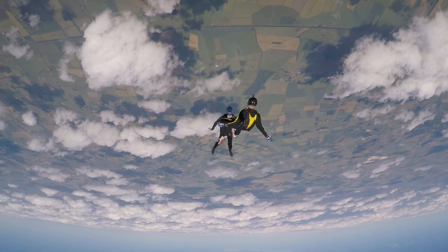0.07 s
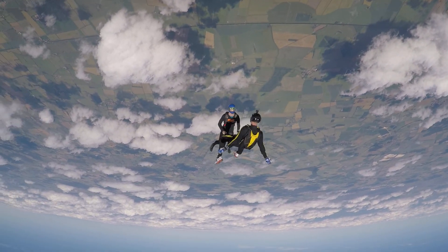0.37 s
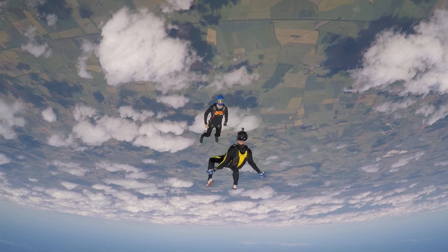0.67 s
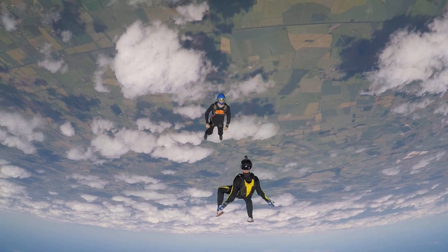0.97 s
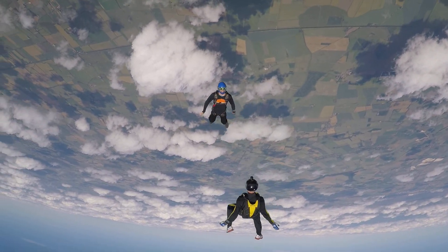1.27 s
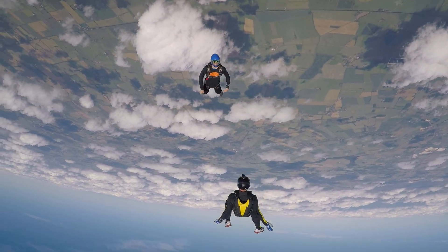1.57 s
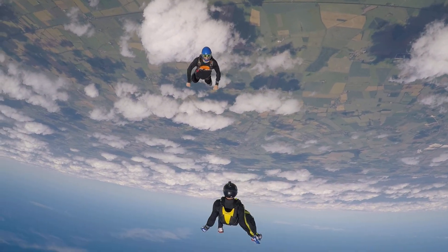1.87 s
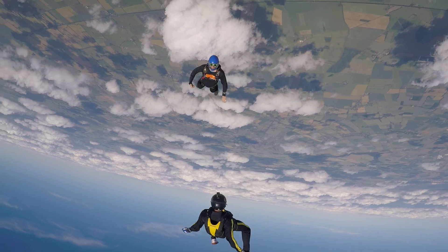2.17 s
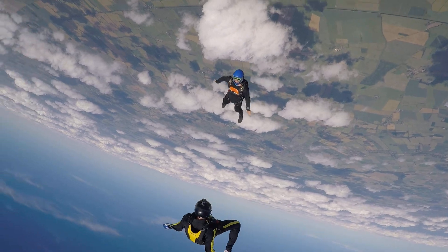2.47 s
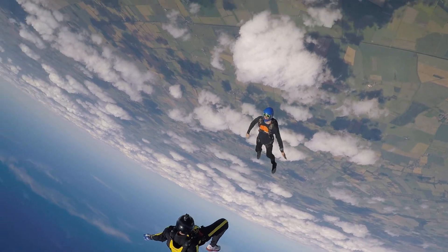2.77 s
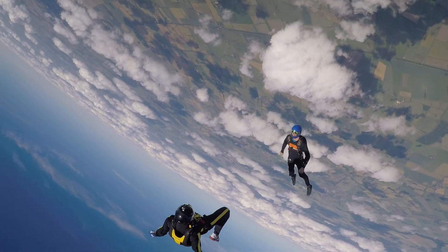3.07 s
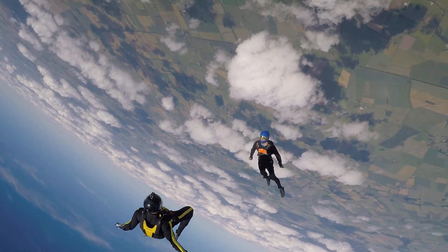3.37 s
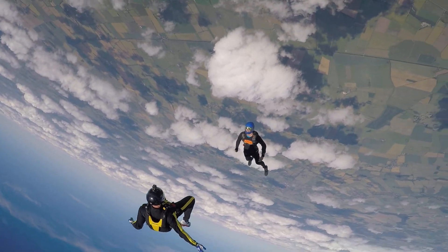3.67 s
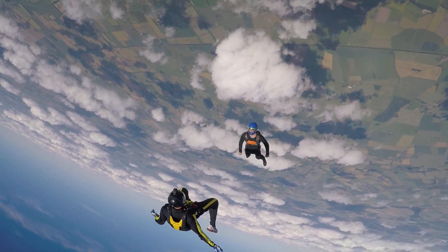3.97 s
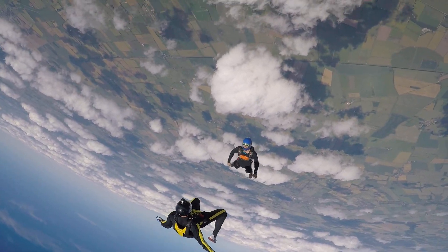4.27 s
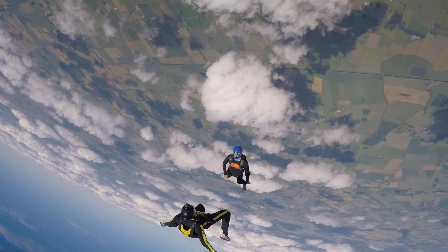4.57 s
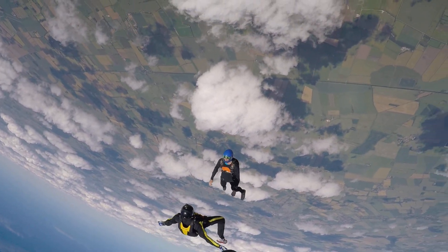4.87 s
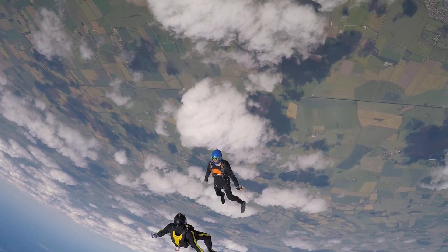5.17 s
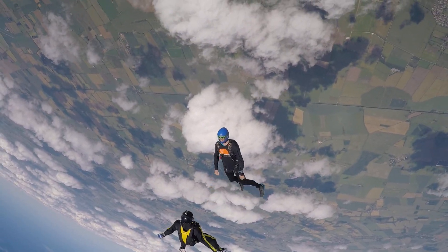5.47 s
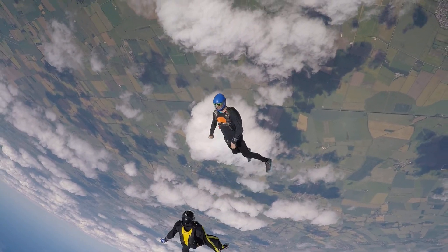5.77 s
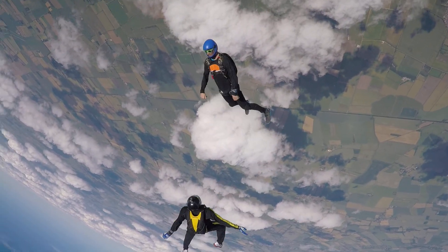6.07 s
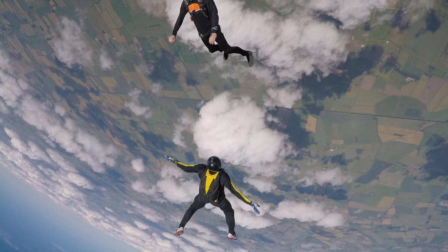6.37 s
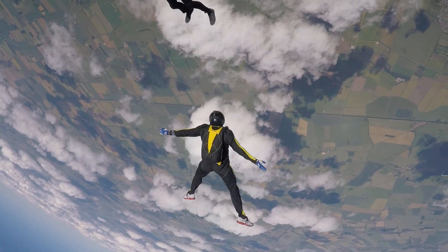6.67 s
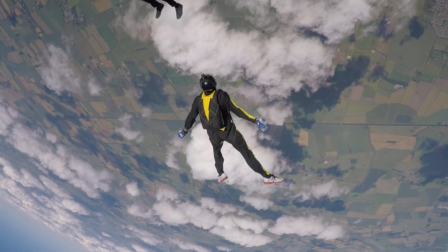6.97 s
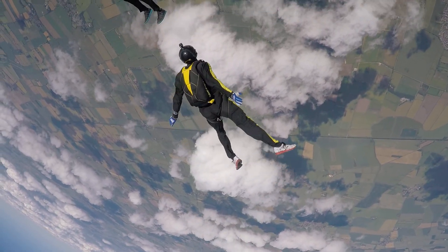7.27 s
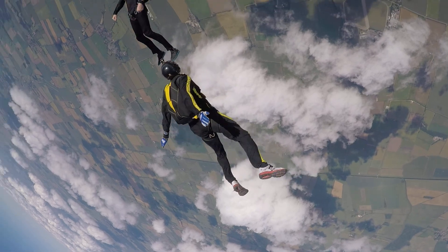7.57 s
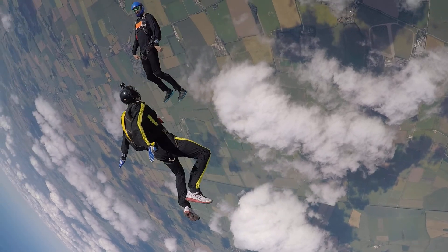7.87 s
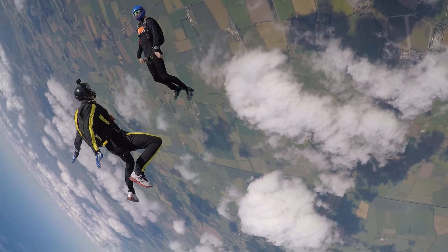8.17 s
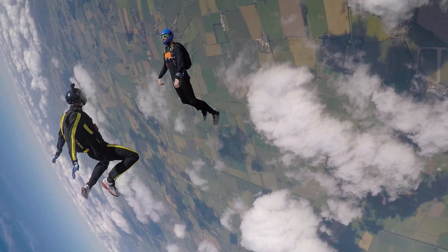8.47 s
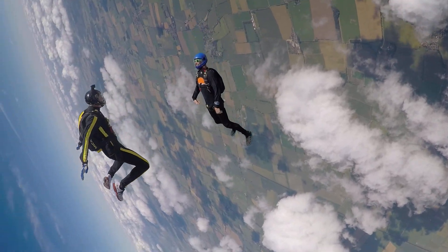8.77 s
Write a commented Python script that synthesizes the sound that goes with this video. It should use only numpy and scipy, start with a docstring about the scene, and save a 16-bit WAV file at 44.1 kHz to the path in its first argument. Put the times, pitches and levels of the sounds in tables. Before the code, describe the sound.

Loud wind roars without a break over a microphone on a skydiver's helmet. Uneven low throbs and rumble buffet the housing, most often in the first half, under a bright rush, hiss and a hollow airy note. A thin wavering whistle sounds at the start and again midway, while breathy howls swell and fade. The churn thickens later, and one dull slap of air lands near the end. Open sky, no echo.

```python
"""Wind buffeting a skydiver's helmet in freefall, heard from a camera microphone on the helmet itself.
Eddies shed by the head thump on the housing, the turbulent wake roars, and air rushing past the shell
blows a hollow note, howls in openings and at times whistles. The force of the flow and the
microphone's depth in the wake set the mix. Mono, in open sky, with no echo."""
import sys
import numpy as np
from scipy import signal
from scipy.fft import rfft, irfft
from scipy.io import wavfile

SR = 44100
rng = np.random.default_rng(int(sys.argv[2]) if len(sys.argv) > 2 else 0)


def materialize(psi):
    """Save the field psi as 16-bit PCM at rate SR to the path in sys.argv[1].

    A 1-D psi becomes a single channel; in a 2-D psi each row is a channel.
    """
    bounded = np.clip(np.atleast_2d(psi).T, -1, 1)
    quanta = np.round(bounded * 32767).astype(np.int16)
    wavfile.write(sys.argv[1], SR, quanta)


N = 394254
TIME = np.arange(N) / SR
BINS_HZ = np.maximum(np.arange(N // 2 + 1) * SR / N, 1)


# Eddies peeling off the head in step, right at the microphone: start_s, end_s, first_hz, last_hz, level_db
THROBS = [(-.06, 0.095, 72, 72, -6.5), (0.142, 0.247, 72, 72, -11), (.26, 0.437, 72.7, 73, -10.5),
          (.57, 0.697, 69, 66.5, -10.5), (0.993, 1.198, 72.6, 73, -11.5), (1.13, 1.357, 98.7, 94, -13.5),
          (1.422, 1.787, 73.4, 73.2, -12), (2.073, 2.22, 81.4, 75, -10.5),
          (2.704, 2.928, 73.8, 72.4, -12.5), (2.948, 3.08, 62, 60, -15), (3.6, 3.9, 70, 71.5, -16),
          (3.979, 4.263, 84, 87, -13), (4.443, 4.62, 84, 73.4, -14.5), (5.169, 5.6, 66.7, 65.3, -18),
          (5.869, 6.52, 70, 71.1, -17.5), (6.9, 7.066, 40, 54, -11), (7.619, 7.9, 74, 41.5, -13),
          (8.118, 8.3, 74, 66, -15), (8.402, 8.54, 59.5, 80, -14), (8.602, 9.0, 88.6, 57.5, -15)]
# Spectrum of the disordered rumble on the housing: frequency_hz, gain_db
RUMBLE_SPECTRUM = [(8, -45), (16, -24), (25, -11), (42, -2.5), (70, -1.5), (98, -2), (125, -14.5),
                   (200, -42), (400, -72)]
# Lulls in that rumble: middle_s, length_s, change_db
LULLS = [(.78, 0.19, -4.5), (1.81, .08, -4), (4.78, .08, -3), (6.7, 0.48, -3), (7.42, 0.43, -3)]

def buffeting(wander=.045, throb_db=1.4, drive=0.4, lurch_db=0.4, rumble_db=-16, give_way_db=-2.5):
    """Eddies peel off the head at an uneven rate, throbbing when in step and rumbling in disorder."""
    throbs, in_step = np.zeros(N), np.zeros(N)
    uneven = 1 + wander * walk(24.4)
    for start, end, first_hz, last_hz, db in THROBS:
        on, swell = spell(start, end, fade_s=0.038)
        hz = np.interp(TIME[on], [start, end], [first_hz, last_hz]) * uneven[on]
        throbs[on] += np.sin(2 * np.pi * np.cumsum(hz) / SR) * swell * undb(db)
        in_step[on] = np.maximum(in_step[on], swell)
    pressure = turbulence(RUMBLE_SPECTRUM) * undb(lurch_db * walk(26))
    rumble = unit(np.tanh(drive * pressure))  # peaks softly squashed, as by the camera's limiter
    rumble *= build_up() * swells(LULLS) * undb(rumble_db + give_way_db * in_step)
    return throbs * undb(throb_db * walk(23)) + rumble


def slap(at_s=8.46, length_s=0.0047, pitch_hz=215, level_db=-10):
    """One hard eddy slaps the housing: a dull knock of a few cycles."""
    t = TIME - at_s
    return undb(level_db) * np.exp(-(t / length_s) ** 2) * np.sin(2 * np.pi * pitch_hz * t)


# Spectra of the rush and the hiss on the shell around the microphone: frequency_hz, gain_db
RUSH_SPECTRUM = [(400, -15), (800, -15), (1100, -2), (1350, -1), (1600, .5), (1950, -0.35), (2250, -.5),
                 (2550, -1.1), (2850, -1), (3050, -5), (3300, -9), (3700, -12), (6000, -41)]
HISS_SPECTRUM = [(4300, 3), (5100, -9), (5500, -0.5), (6000, 1), (6450, 1), (6880, 4.5), (7250, 0),
                 (7700, 1), (8200, -6.5), (8800, -34), (11000, -35)]

def airstream(port_hz=6890, port_db=-43):
    """Air scours the shell; the microphone port rings, and gains on the hiss as that grows."""
    rush = turbulence(RUSH_SPECTRUM) * blown(-19.5, per_flow=1.1, per_depth=0.21, trim_db=0.13)
    hiss_gain = blown(-32.5, per_flow=0.6, per_depth=-0.27)
    hiss = turbulence(HISS_SPECTRUM) * hiss_gain
    port = resonance(np.full(N, port_hz), drift_hz=170) * undb(port_db) * unit(hiss_gain) ** 2
    return rush + hiss + port


# Spectra of the large swirls and the fine churn just behind the head: frequency_hz, gain_db
SWIRL_SPECTRUM = [(60, -24), (100, -2), (125, 0.5), (160, -1.5), (200, -8), (260, -14), (350, -19),
                  (600, -27), (2000, -70)]
CHURN_SPECTRUM = [(120, 0), (260, 1), (400, -1), (520, -1), (650, 1), (790, 4), (900, 0), (1100, -25.5),
                  (1600, -25), (4000, -60)]
# Gusts that swell the swirls: middle_s, length_s, rise_db
GUSTS = [(.95, 0.41, 6), (1.55, 0.18, 3.5), (2.1, 0.35, 4), (2.73, 0.32, 3.5), (3.33, 0.13, 0),
         (3.65, 1, 5.5), (4.5, .25, 2.5), (5.0, 0.24, 3), (5.72, 0.36, 3.5), (6.88, 0.5, 5)]

def wake(unrest_db=0.34):
    """Large swirls come in gusts and break down into a finer churn."""
    swirl = turbulence(SWIRL_SPECTRUM) * blown(-25, per_flow=0.4, per_depth=-0.05, trim_db=-0.27)
    swirl *= build_up() * swells(GUSTS) * undb(unrest_db * walk(9))
    churn = turbulence(CHURN_SPECTRUM) * blown(-26.5, per_flow=0.73, per_depth=0.6751, trim_db=-0.6)
    return swirl + churn


# The note of a hollow in the helmet, close to the microphone: time_s, pitch_hz
HOLLOW_PITCH = [(0, 926), (1.9, 955), (3, 946), (4.6, 955), (5.4, 912), (6.9, 924), (8.94, 914)]
# Its strength before the trim: time_s, level_db
HOLLOW_LEVEL = [(0, -27), (.5, -34), (1.05, -26), (1.4, -30.5), (1.58, -25), (1.88, -28.5), (2.28, -24.5),
                (2.4, -32), (2.65, -24.5), (3.45, -25.5), (4.4, -20.5), (5.3, -28.5), (5.9, -31),
                (6.15, -24), (7.2, -27.5), (7.7, -24), (8.6, -21.5), (8.94, -28)]

def hollow(trim_db=-0.6):
    """The stream blows across the mouth of a cavity, as over a bottle: an airy note."""
    note = resonance(curves(HOLLOW_PITCH)[0], drift_hz=68)
    return note * undb(curves(HOLLOW_LEVEL)[0] + trim_db)


# Wider openings in the helmet, before the trim: start_s, end_s, first_hz, last_hz, width_hz, level_db
OPENINGS = [(0.848, 1.499, 1370, 1355, 200, -33), (.8, 1.5, 4300, 4460, 500, -43),
            (1.601, 2.398, 2470, 2466, 240, -35.5), (2.399, 4.299, 4490, 4640, 674, -32),
            (2.547, 3.904, 1500, 1520, 340, -26), (3.85, 4.799, 1477, 1520, 450, -26.5),
            (2.9, 3.353, 6630, 6680, 450, -34), (2.901, 3.42, 2810, 2860, 180, -28.5),
            (4.6, 5.198, 5100, 5200, 394, -35.5), (4.994, 6.297, 761.5, 774, 240, -28.5),
            (5.25, 6.798, 2181, 2257, 130, -29), (6.598, 7.699, 1563, 1566, 239.6, -26.5),
            (7.303, 7.9, 738, 772, 240, -28), (7.452, 8.002, 3220, 3450, 400, -31),
            (7.8, 9.102, 2243, 2164, 220, -25), (7.701, 9.1, 2870, 2880, 260, -30),
            (8.201, 8.802, 1547, 1555, 200, -25), (8.249, 9.1, 3440, 3520, 450, -33),
            (8.251, 9.2, 10050, 10200, 1800, -41)]

def openings(trim_db=-1):
    """Each opening howls or hisses while the air meets it squarely: it swells, glides and dies."""
    howls = np.zeros(N)
    for start, end, first_hz, last_hz, width_hz, db in OPENINGS:
        on, swell = spell(start, end, fade_s=0.092)
        hz = np.interp(TIME[on], [start, end], [first_hz, last_hz])
        howls[on] += resonance(hz, drift_hz=width_hz / 2) * swell * undb(db + trim_db)
    return howls


# Two thin whistles at a narrow gap nearby, a list each, before the trim: time_s, pitch_hz, level_db
WHISTLES = [
    [(0, 1648, -29.5), (.5, 1690, -33), (.9, 1674, -33), (1.15, 1680, -27), (1.45, 1657, -33),
     (1.9, 1566, -43)],
    [(3.75, 1662, -37), (4.05, 1686, -28), (4.25, 1760, -30), (4.5, 1770, -28), (4.7, 1815, -36)],
]

def whistle(waver=0.0049, shiver_db=2.5, trim_db=-1.0, fade_s=0.089):
    """An edge tone that keeps itself going, shaken by the turbulence."""
    tones = np.zeros(N)
    bend = 1 + waver * walk(40)
    shiver = undb(shiver_db * walk(30))
    for course in WHISTLES:
        hz, db = curves(course)
        on, swell = spell(course[0][0] - fade_s, course[-1][0] + fade_s, fade_s)
        phase = 2 * np.pi * np.cumsum(hz[on] * bend[on]) / SR
        tones[on] += unit(np.sin(phase) * shiver[on]) * swell * undb(db[on] + trim_db)
    return tones


# Spectra of the faint sizzle and higher spray off the helmet's edges: frequency_hz, gain_db
SIZZLE_SPECTRUM = [(2200, -18), (3100, -10), (3400, -7.5), (3750, 0.3), (4150, 3), (4700, 2), (5100, 1.5),
                   (5500, -5), (7000, -20)]
SPRAY_SPECTRUM = [(6500, -14), (8300, 3.5), (9200, -2), (10000, -1), (10800, -1), (11400, -4),
                  (12300, -2.5), (13200, -6), (14000, -10), (15200, -11)]

def edges():
    """Sharp edges tear the air into the smallest eddies."""
    sizzle = turbulence(SIZZLE_SPECTRUM) * blown(-31.5, per_flow=1.0, per_depth=-0.02, trim_db=0.26)
    spray = turbulence(SPRAY_SPECTRUM) * blown(-41.5, per_flow=1.0, per_depth=-0.19, trim_db=2.5)
    return sizzle + spray


# Force of the air on the helmet as the head turns: time_s, above_usual_db
FLOW = [(0, -1.2), (0.42, -4.5), (1.12, 0.2), (1.45, -2.0), (1.75, -6.5), (2.3, -4), (2.65, -0.2),
        (3.1, 1.5), (3.4, 0.5), (4.4, -0.6), (5.1, 0.8), (6.05, -0.4), (6.5, 1.1), (7.1, -0.6),
        (8.05, -0.0), (8.45, 0.5), (8.94, 0.3)]
# How deep the microphone lies in the wake, heard as churn against hiss: time_s, above_usual_db
WAKE_DEPTH = [(0, 0.7), (0.8, -0.5), (1.15, 1), (1.6, -2.6), (2.2, -1), (3.05, -6.5), (3.5, -1.5), (4.8, 1),
              (5.25, 6), (5.95, 10.5), (6.1, 7), (6.27, 1.6), (6.55, 5), (6.9, 9), (7.55, 8.5), (8.2, -1.2),
              (8.7, 2), (8.94, -0.8)]

def blown(base_db, per_flow, per_depth, trim_db=0):
    """Gain of a layer: the flow raises it and the wake feeds or shelters it, both in dB per dB."""
    return undb(base_db + trim_db + per_flow * curves(FLOW)[0] + per_depth * curves(WAKE_DEPTH)[0])


def build_up(rise_db=2.5, rise_s=1.2):
    """Gain of the low turbulence, which grows to full strength and stays."""
    return undb(-rise_db * np.clip(1 - TIME / rise_s, 0, 1))


def turbulence(spectrum):
    """Pressure noise of rms 1, shaped by a spectrum and silent outside it."""
    hz, db = np.transpose(spectrum)
    return noise(undb(np.interp(np.log(BINS_HZ), np.log(hz), db, left=-120, right=-120)))


def resonance(hz, drift_hz):
    """A blown resonance round a moving pitch: the faster its size and phase drift, the wider its band."""
    pole = np.exp(-2 * np.pi * drift_hz / SR)
    drift = signal.sosfilt([[1, 0, 0, 1, -pole, 0.00092]] * 2, rng.standard_normal((2, len(hz))))
    phase = 2 * np.pi * np.cumsum(hz) / SR
    return unit(drift[0] * np.cos(phase) + drift[1] * np.sin(phase))


def walk(rate_hz):
    """A smooth random curve of rms 1 that changes about rate_hz times a second."""
    return noise(1 / (1 + (BINS_HZ / rate_hz) ** 4))


def noise(gain):
    """Noise of rms 1 with the given gain at each frequency."""
    return unit(irfft(rfft(rng.standard_normal(N)) * gain, N))


def spell(start, end, fade_s):
    """The stretch of time between start and end, and an envelope that fades in and out over it."""
    on = (TIME > start) & (TIME < end)
    return on, np.clip(np.minimum(TIME[on] - start, end - TIME[on]) / fade_s, 0, 1)


def swells(table):
    """Gain of smooth, bell-shaped rises or dips."""
    bells_db = (db * np.exp(-np.minimum((2 * (TIME - at) / length) ** 2, 20)) for at, length, db in table)
    return undb(sum(bells_db))


def curves(table):
    """The columns of a table, joined by straight lines in time."""
    time_s, *columns = np.transpose(table)
    return [np.interp(TIME, time_s, column) for column in columns]


def unit(x):
    """Scale to rms 1."""
    return x / np.sqrt(np.mean(x ** 2))


def undb(db):
    """Decibels to gain."""
    return 10 ** (np.asarray(db) / 20)


def scene(flutter_db=0.39, unrest_db=0.23):
    """Every passing eddy briefly speeds the air, so the rush flutters with the thumping."""
    thump = buffeting() + slap()
    flutter = undb(flutter_db * unit(thump) + unrest_db * walk(23))
    air = wake() + airstream() + edges() + hollow() + whistle() + openings()
    return (thump + flutter * air)[None]


def record(dry, ceiling=0.99, top_hz=15250):
    """The helmet camera rounds the highest peaks and cuts the top of the treble."""
    rounded = dry / (1 + (dry / ceiling) ** 8) ** (1 / 8)
    return signal.sosfilt(signal.ellip(12, .1, 80, top_hz, fs=SR, output="sos"), rounded)


dry = scene()
out = record(dry)
materialize(out)
```